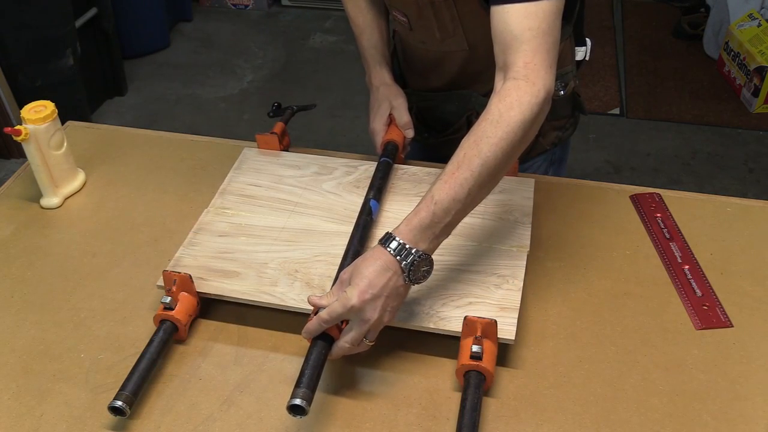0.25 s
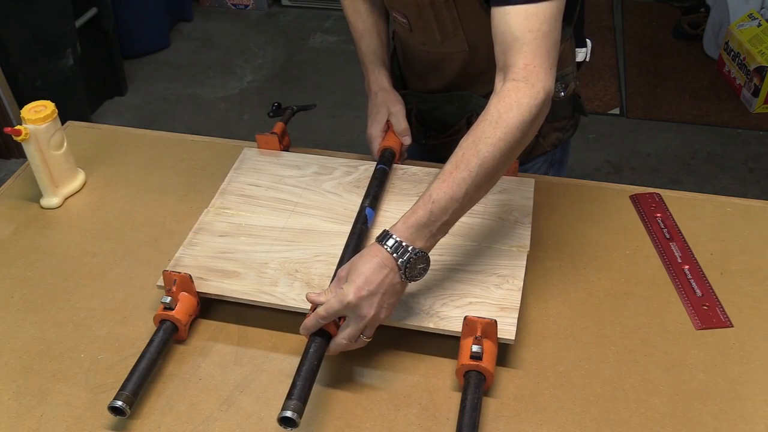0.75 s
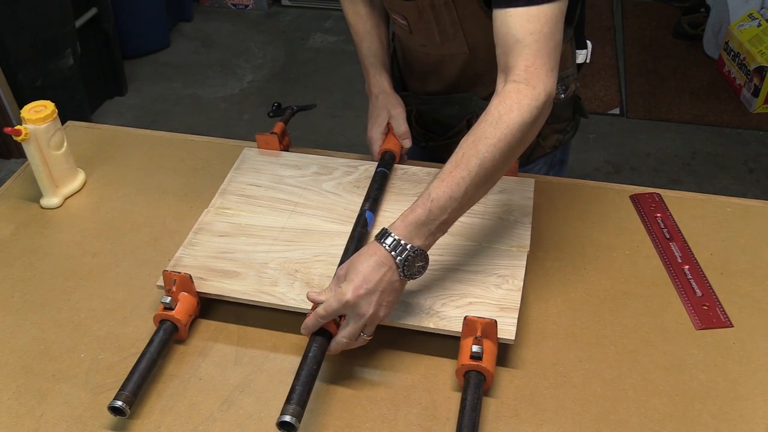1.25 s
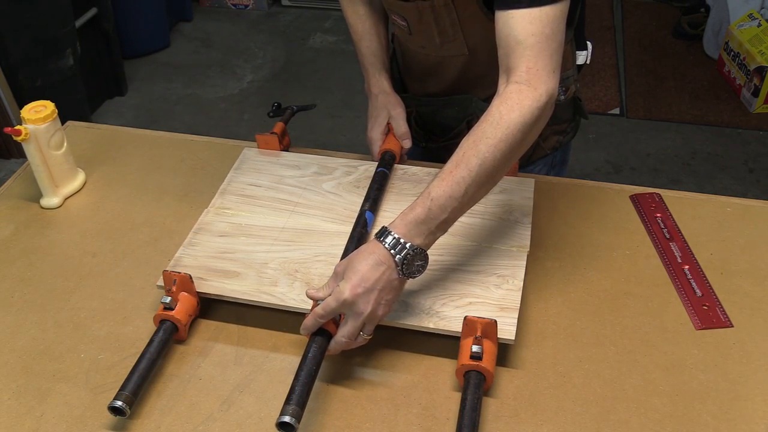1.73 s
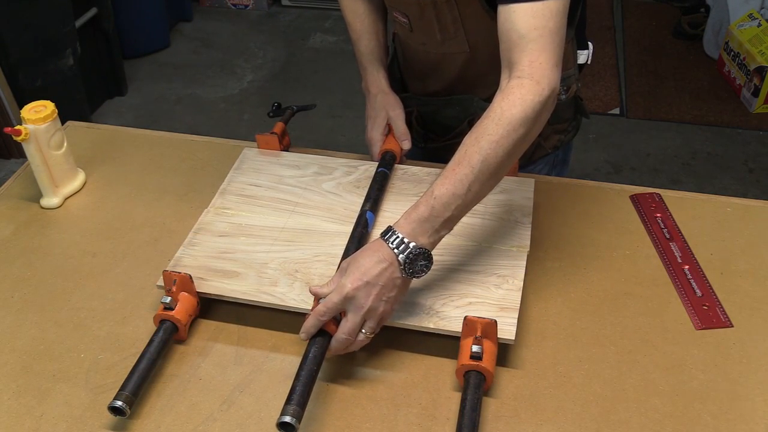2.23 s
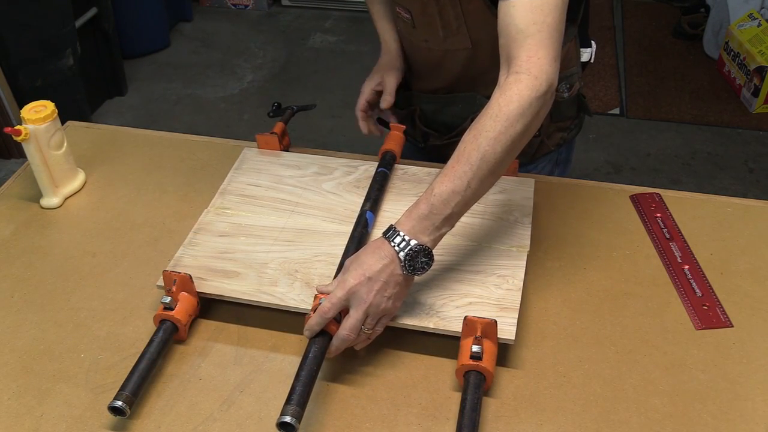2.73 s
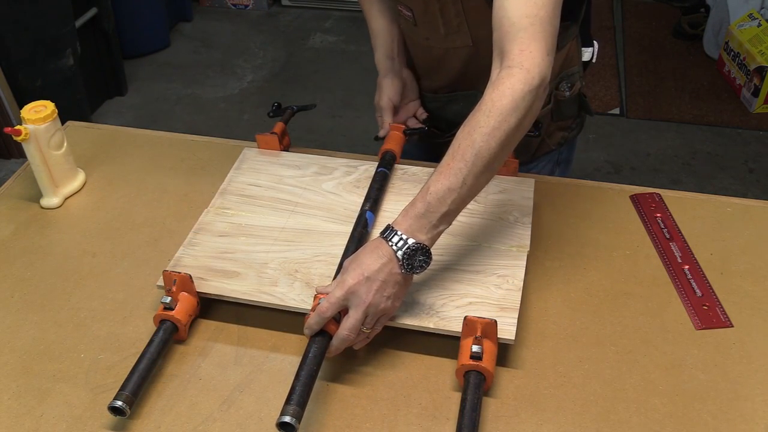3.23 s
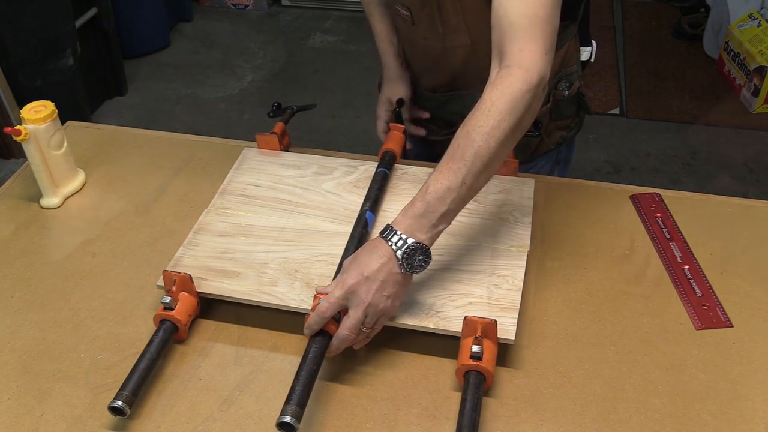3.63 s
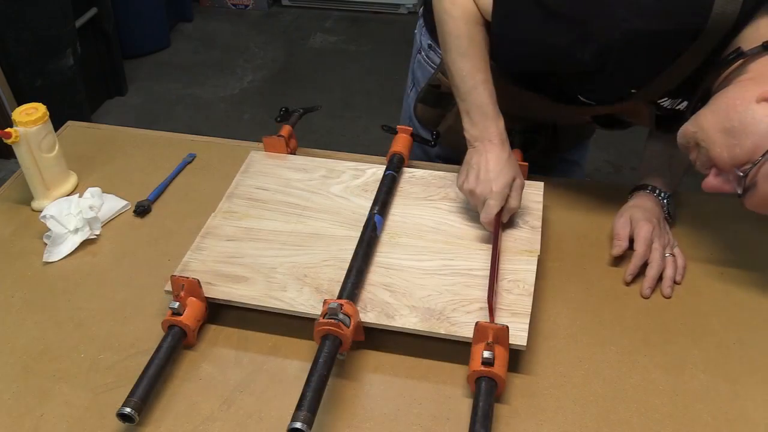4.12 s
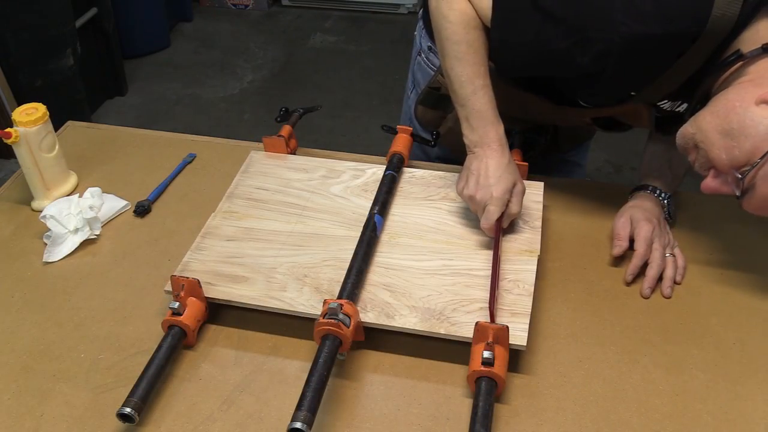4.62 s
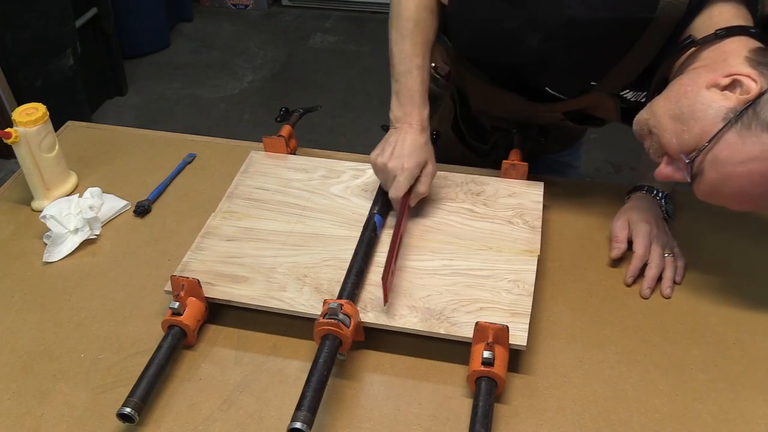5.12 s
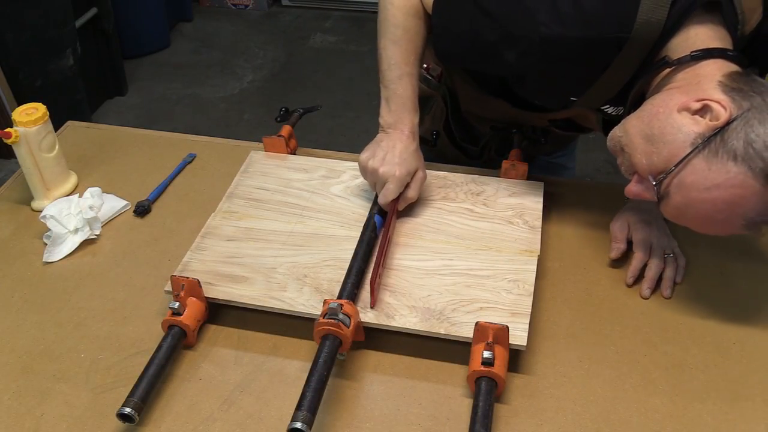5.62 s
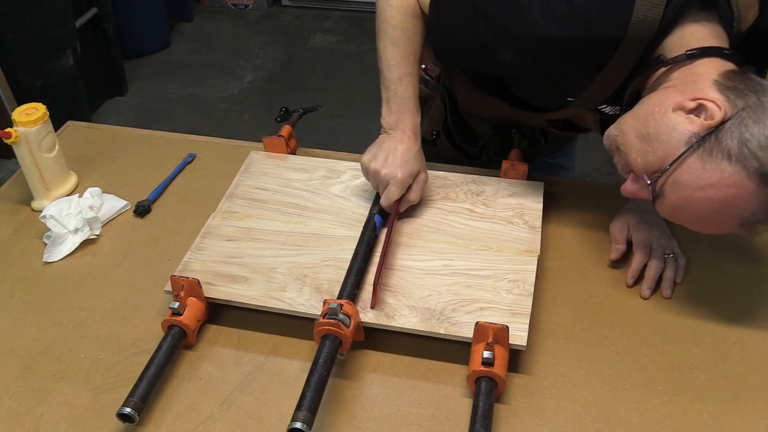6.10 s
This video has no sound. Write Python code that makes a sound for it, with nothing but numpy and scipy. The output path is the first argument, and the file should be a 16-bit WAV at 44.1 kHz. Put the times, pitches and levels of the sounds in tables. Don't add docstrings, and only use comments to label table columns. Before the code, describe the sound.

Dull, woody knocks of pipe clamps come irregularly, with tiny iron ticks and short drags, then bunch together as a loose jaw rattles while tightening. After a quieter spell of light metal-on-wood sliding, a thin rule slaps down loudly several times in quick succession, chattering to rest. Close pickup, small lively workshop, soft room air and hiss.

```python
import sys
import numpy as np
from scipy import signal
from scipy.io import wavfile
from scipy.ndimage import uniform_filter1d

SR = 44100
rng = np.random.default_rng(int(sys.argv[2]) if len(sys.argv) > 2 else 0)


def inscribe(sig):
    pcm = np.round(np.clip(np.atleast_2d(sig).T, -1, 1) * 32767)
    wavfile.write(sys.argv[1], SR, pcm.astype(np.int16))


def elevation(decibels):
    levels = np.asarray(decibels, float)
    return 10 ** (levels / 20)


N = 280476


def evened(x):
    return x / np.sqrt(np.mean(x ** 2) + 1e-20)


def add(mix, start_s, sound):
    part = mix[round(start_s * SR):][:len(sound)]
    part += sound[:len(part)]


def band(x, low_hz, high_hz):
    return signal.sosfilt(signal.butter(3, [low_hz, high_hz], "band", fs=SR, output="sos"), x)


def resonate(x, hz, width_hz):
    return signal.lfilter(*signal.iirpeak(hz, hz / width_hz, SR), x)


def rings(modes, luck, detune, length_s):
    hz, db, t60 = np.array(modes).T[:, :, None]
    t = np.arange(round(length_s * SR)) / SR
    hz = hz * (1 + detune * luck[:, :1])
    level = elevation(db + 1.13 * luck[:, 1:2] - 60 * t / t60)
    return t, level * np.sign(luck[:, 2:]) * np.sin(2 * np.pi * hz * t)


def blows_of(contacts, treble_db):
    return sorted((s, db, db + weight, db + ring, hz, db + ring + hard)
                  for rows, hard in zip(contacts, treble_db) for s, db, weight, ring, hz in rows)


GROUP_EDGES_HZ = [350, 650, 1300]
RISE_S = [0.002, 0.0046, 0.0013, 0.00088]


def knocks(events, body, softness, crack_db, bright_db, twin_s, twin_db, wash_db, wash_t60, wash_hz):
    low, high, power_in = np.zeros(N), np.zeros(N), np.zeros(N)
    hz = np.array(body)[:, 0]
    group = np.searchsorted(GROUP_EDGES_HZ, hz)
    lucks = rng.standard_normal((len(events), len(body), 3))
    t = np.arange(2000) / SR
    grits = rng.standard_normal((len(events), 2000))
    grits = grits * elevation(-60 * t / 0.021) * np.minimum(t / (softness * 0.00035), 1)
    bright = band(grits, 2740, 4500) + 0.26 * band(grits, 5230, 8600)
    cracks = band(grits, 580, 1430) + elevation(bright_db) * bright
    for (s, panel, bench, upper, spot_hz, treble), luck, crack in zip(events, lucks, cracks):
        t, modes = rings(body, luck, detune=0.0078, length_s=0.21)
        near = np.where(group == 2, elevation(-12 * np.minimum(abs(hz - spot_hz) / 200, 1)), 1)
        for k, db in enumerate([bench, panel, upper, treble]):
            rise = 1 - np.exp(-(t / (softness * RISE_S[k])) ** 2)
            part = (near[:, None] * modes)[group == k].sum(0) * rise
            add(high if k > 1 else low, s - .001, elevation(db) * part / abs(part).max())
        add(high, s - .0005, elevation(treble + crack_db) * crack / abs(crack).max())
        add(power_in, s + 0.0027, (elevation(upper) ** 2 + elevation(panel) ** 2) * np.hanning(200) / 100)
    add(low, twin_s, -elevation(twin_db) * high)
    power = signal.lfilter([1], [1, -elevation(-120 / (max(wash_t60, .02) * SR))], power_in)
    noise = rng.standard_normal(N)
    wash = evened(band(band(noise, 290, wash_hz), 190, 1.06 * wash_hz))
    wash += elevation(-13.5) * evened(band(noise, 1.05 * wash_hz, 1.41 * wash_hz))
    return low + high + elevation(wash_db) * np.sqrt(abs(power)) * wash


# pitch_hz, level_db, t60_s
CLAMP_BODY = [(172.6, 7.5, 0.17), (210, 10, 0.19), (309, 14, 0.068), (590, -11.5, 0.019), (427.4, 7, 0.03),
              (501, -5, 0.047), (707, -3.5, 0.049), (860, 7, 0.013), (990, -2.5, 0.046),
              (1138, -6.5, 0.017), (1590, -12, 0.054), (1560, 15.5, 0.013), (1892, 10.5, 0.022),
              (1980, 0, 0.028), (2430, -5.5, 0.025), (3050, -15, 0.02), (3330, -9, 0.034)]
# start_s, strength_db, weight into the bench_db, ring of the spot_db, pitch of the spot_hz
CLAMP_EDGE = [(.764, -53.5, -3, 13, 900), (.778, -50.5, 2, 9, 950), (.819, -65.5, -5, 22.5, 935),
              (1.138, -31, 6, -13, 945), (1.15, -32.5, 9, -19, 940), (1.495, -40.5, -1, -12, 920),
              (1.845, -38.5, -20, 10, 1080), (1.993, -35, -11, 1, 1080), (2.011, -45, -8, -1, 1200),
              (3.039, -46, 3, -5, 690), (3.367, -35.5, -13, -8, 990), (3.395, -28, -6, 3, 940),
              (3.4362, -21, -12, 2.5, 990), (3.444, -32, -16, 7.5, 680), (3.498, -34, -8, -1.5, 1010)]
CLAMP_FACE = [(1.058, -20.5, -24, 0, 870), (1.077, -51, 26.5, 19, 850), (1.165, -35, -3, -22, 724),
              (1.821, -39, -10, -6, 1000), (2.168, -37.5, -13, -1.5, 810), (2.519, -33, -7, -4.5, 750),
              (3.11, -30.5, -2.5, 2.5, 860), (3.274, -37, -8, -1, 1030), (3.331, -34.5, -8, -4, 830),
              (3.537, -24, -2.5, 11, 707), (3.575, -30, -9, 1, 706), (3.589, -53, -8, 21, 674)]
CLAMP_PAD = [
    (1.849, -19.5, -14.5, -8.5, 1080),
    (1.862, -47, 6, 2, 1140),
    (3.054, -35.5, 5, 6, 730),
    (3.129, -34, -4, 2.5, 700),
    (3.243, -32.5, -4, -4, 1090),
    (3.4, -27.5, -6.5, -3.5, 910),
    (3.476, -26, -11, 1, 680),
]


def clamp_blows():
    blows = blows_of([CLAMP_EDGE, CLAMP_FACE, CLAMP_PAD], treble_db=[-3.5, -16.5, -21])
    return elevation(-1.5) * knocks(blows, CLAMP_BODY, softness=2.55, crack_db=-10.5, bright_db=-13.0,
                              twin_s=0.004164, twin_db=-11.0, wash_db=-25.5, wash_t60=0.26, wash_hz=1300)


# pitch_hz, level_db, t60_s
RULE_BODY = [(201, -5.5, 0.24), (320, -0.5, 0.095), (419.8, 3, 0.27), (461, -2.5, 0.16), (579.6, 3.5, 0.14),
             (718, 8.5, 0.055), (870, -10.5, 0.087), (937, 2.5, 0.032), (1100, 13, 0.036), (1140, 6, 0.016),
             (1270, 6, 0.026), (1200, 4, 0.02), (1535, 12, 0.032), (1570, -8, 0.02), (1740, 15, 0.028),
             (1900, -4, 0.0053)]
RULE_EDGE = [
    (4.936, -41.5, 4.5, 0.5, 650),
    (5.046, -48, 5, 3, 850),
    (5.255, -51, -16, 5.5, 860),
    (5.3355, -6.5, -14.5, -3, 855),
    (5.371, -8, -17, 1.5, 870),
    (5.985, -51, -14, 1, 1220),
    (6.079, -60, 1, -13, 900),
    (6.284, -50, 2, 6, 1250),
]
RULE_FACE = [
    (3.963, -49, -17, 4, 730),
    (4.878, -46, 4.5, -6, 735),
    (5.387, -35, 9, 22.5, 860),
    (5.397, -15.5, -5.5, 0, 950),
    (5.416, -18.5, -2.5, -8, 920),
    (5.839, -53.5, -8, 5, 650),
    (6.17, -55, 13.5, 4, 950),
    (6.317, -36.5, -10, -12, 643),
]


def rule_blows():
    blows = blows_of([RULE_EDGE, RULE_FACE], treble_db=[-5.5, -12.5])
    return elevation(-2.5) * knocks(blows, RULE_BODY, softness=0.6, crack_db=-6.0, bright_db=-24.0,
                              twin_s=0.002813, twin_db=4.0, wash_db=-26.5, wash_t60=0.57, wash_hz=1300)


# pitch_hz, level_db, t60_s
LANDED_BODY = [(163, -13, 0.14), (214, -6, 0.11), (336, -3, 0.24), (404, 3, 0.2), (470, -5, 0.069),
               (553, 2.5, 0.23), (709, -6, .05), (850, -7, 0.041), (935, -11, 0.073), (1070, 5, 0.071),
               (1220, 17, 0.012), (1498, -1, 0.058), (1600, 6, 0.024), (1730, 6, 0.045)]
LANDING = [
    (5.46, -13, -11, 5.5, 1158),
    (5.472, -27.5, 3, -12, 1010),
    (5.503, -23, -10, -23, 940),
]


def rule_landing():
    return knocks(blows_of([LANDING], treble_db=[-4.5]), LANDED_BODY, softness=0.51, crack_db=0.5,
                  bright_db=-30.5, twin_s=0.00285, twin_db=3.5, wash_db=-25.0, wash_t60=0.64, wash_hz=1316)


# start_s, level_db, pitch_hz, t60_s
TAPS = [(1.822, -46, 900, .012), (3.433, -34.5, 3240, 0.025), (3.438, -36.5, 2860, .04),
        (3.476, -44, 1560, .04), (3.536, -44, 3280, 0.023), (3.537, -43, 2850, 0.028),
        (3.989, -48, 2000, 0.023), (4.9757, -32.5, 1390, 0.0095), (4.977, -35, 700, 0.017),
        (5.067, -28, 1360, 0.01), (5.068, -29.5, 530, 0.03), (5.371, -24, 4300, 0.0069),
        (5.4613, -30, 3260, 0.0047), (5.842, -37.5, 800, 0.011), (6.319, -33, 547, 0.034),
        (.7637, -44, 1300, .01), (.782, -40, 2090, .02), (.804, -47, 1700, .015), (.8186, -38, 2000, 0.014),
        (1.0, -43, 2030, 0.014), (1.0406, -47, 2080, 0.016), (1.101, -40, 1700, .008),
        (1.133, -47, 2020, .03), (3.105, -47, 1850, .03), (6.226, -39.5, 1300, .012),
        (1.847, -44, 3230, .01), (3.455, -45, 1600, 0.027), (3.534, -38, 1900, 0.023),
        (5.337, -33, 2450, 0.018), (5.3709, -8.5, 1570, 0.019), (5.4607, -35, 5800, 0.0038),
        (6.358, -8.5, 1200, 0.0036), (6.3575, -27.5, 4730, 0.0031)]
# start_s, level_db, pitch_hz, t60_s
BLOW_MODES = [(1.067, -33.5, 190, 0.13), (1.129, -33, 109, 0.16), (1.158, -34, 503, .08), (1.138, -29, 310, .07),
              (1.139, -32, 500, .1), (1.0585, -28, 880, .04), (1.069, -35, 850, .04), (1.077, -31, 400, .05),
              (1.06, -42, 1480, .04), (1.186, -38, 450, .04), (2.52, -36, 480, .02), (5.336, -24, 290, .06),
              (1.8495, -25.5, 448, 0.027), (1.866, -29.5, 496, 0.037), (1.851, -28, 1070, 0.027),
              (2.1685, -18, 484, .045), (2.184, -25.5, 470, 0.046), (2.525, -30.5, 410, 0.037),
              (3.272, -28, 454, 0.092), (3.275, -35, 987, 0.033), (3.283, -27.5, 450, 0.036),
              (5.337, -14, 1150, 0.038), (5.341, -17.5, 455, 0.08), (5.343, -12, 571, 0.13),
              (5.385, -21, 934, .08),
              (3.04, -29, 220, 0.16), (3.041, -31, 400, 0.12), (3.065, -33, 232, 0.08),
           (3.118, -32, 513, 0.033), (3.138, -30, 380, 0.062), (3.177, -35, 350, 0.028),
           (3.249, -30, 397, 0.045), (3.26, -29, 380, 0.029), (3.001, -49, 1850, .04),
           (6.284, -40, 1200, .015), (1.847, -33, 1900, 0.014), (1.856, -40, 1580, .02),
           (1.995, -37, 1530, 0.022), (2.011, -37, 454, 0.016), (3.3951, -28, 1800, 0.021),
           (3.402, -26, 950, .03), (3.415, -33, 950, .025), (3.432, -18.5, 450, 0.034),
           (3.4382, -23, 1570, 0.044), (3.452, -27, 478, .05), (3.478, -35, 780, .03),
           (3.511, -34, 500, 0.027), (3.587, -31, 700, 0.027), (5.336, -28, 1900, 0.023),
           (5.336, -15, 840, .03), (5.337, -38, 4300, 0.011), (5.388, -14, 1540, 0.022),
           (5.398, -25, 1900, .02), (5.418, -27, 1150, .02), (5.4605, -29, 1960, .015),
           (5.462, -23, 2900, .012), (5.461, -27, 2450, .015), (5.462, -13, 438, 0.043)]
LINGERS = [(5.345, -21, 870, 0.24), (5.35, -25, 933, .2), (5.385, -28, 1160, .1), (5.385, -28, 1600, .1),
           (5.385, -30, 1750, .1), (5.462, -18, 1750, .03), (5.47, -27, 549, .3), (5.49, -36, 930, .4),
           (5.372, -17, 578, 0.14), (5.371, -21, 426, 0.16), (5.39, -18.5, 935, 0.18),
           (5.47, -26, 1064, 0.22), (5.468, -47, 1230, .4), (5.469, -44, 1630, 0.27),
           (5.475, -33, 404, .35), (5.47, -35.5, 841, 0.52), (5.47, -44.5, 1453, 0.45),
           (5.337, -20, 419, .2), (5.35, -20, 567, .2), (5.448, -26, 600, 0.055)]


def taps():
    out, t = np.zeros(N), np.arange(12000) / SR
    for s, db, hz, t60 in TAPS + BLOW_MODES + LINGERS:
        pair = np.sin(2 * np.pi * hz * t) + 0.11 * np.sin(2 * np.pi * 1.13 * hz * t)
        rise = np.minimum(t * hz / 0.82, 1)
        add(out, s, elevation(db - 60 * t / t60) * pair * rise)
    return out


# pitch_hz, level_db, t60_s
IRON = [(2116, -12.5, 0.56), (2325, -16, 0.51), (2770, -13, 0.34), (2939, -9, 0.55), (2987, -12, 0.7),
        (3240, -0.5, 0.045), (3892, -21, 0.54), (4180, -19, 0.55), (4600, -8, 0.19), (4650, -15.5, 0.55),
        (5360, -15.5, .25), (5850, -16.5, 0.39), (7130, -8, .07), (7700, -12, 0.065), (8300, -21, .06)]


def iron_clink():
    out = np.zeros(N)
    luck = rng.standard_normal((len(IRON), 3)) * [0, 0, 1]
    t, modes = rings(IRON, luck, detune=0, length_s=.5)
    crack = 1.1 * band(rng.standard_normal(len(t)), 1070, 7000) * elevation(-60 * t / 0.09)
    add(out, .131 - .003, elevation(-15 - 24.5) * (modes.sum(0) + crack) * np.minimum(t / 0.0018, 1))
    return out


# ratio to the main ring, level_db, t60_s
SMALL_IRON = [(.9, 0, .03), (1, 0, .028), (1.17, -9, .02), (1.64, -7, .02)]
# start_s, level_db, share of the lowest mode, pitch of the main ring_hz
TICKS = [(0.765, -47, .1, 4970), (.82, -59, 0.13, 4960), (1.03, -51, .1, 5030), (1.08, -56, .1, 4950),
         (1.12, -47, .1, 4970), (3.801, -50, 0.98, 4680), (3.812, -48, 0.98, 4600), (3.819, -46, .95, 4680),
         (3.829, -51, 0.83, 4650), (3.866, -51, .1, 5450), (3.893, -37, 0.36, 4620), (3.914, -50, .1, 4700),
         (3.921, -40, 0.15, 4630), (3.931, -51, 0.08, 4680)]


def iron_ticks():
    out = np.zeros(N)
    lucks = rng.standard_normal((len(TICKS), len(SMALL_IRON), 3))
    for (s, db, share, pitch_hz), luck in zip(TICKS, lucks):
        t, modes = rings(np.multiply(SMALL_IRON, [pitch_hz, 1, 1]), luck, detune=0.0023, length_s=.15)
        ring = share * modes[0] + (1.1 - share) * modes[1:].sum(0)
        add(out, s, elevation(db) * ring * np.minimum(t / 0.0047, 1))
    return out


def scrapes(strokes, body, slips_per_s, slip_db):
    start, out = strokes[0][0] - .4, np.zeros(N)
    n = round((strokes[-1][0] + .5 - start) * SR)
    slips = (rng.random(n) < slips_per_s / SR) * elevation(slip_db * np.minimum(rng.exponential(1, n), 4))
    drive = evened(slips * rng.choice([-1, 1], n)) + .5 * rng.standard_normal(n)
    sound = np.zeros(n)
    for k, (hz, width, db) in enumerate(body):
        resonance = resonate(resonate(drive, hz, width), hz, 2 * width)
        sound += (-1) ** k * elevation(db) * evened(resonance)
    level, t = np.zeros(n), start + np.arange(n) / SR
    for s, db, build, release in strokes:
        level += elevation(db - 20 * np.maximum((s - t) / build, (t - s) / release))
    add(out, start, evened(sound) * uniform_filter1d(level, size=200))
    return out


# time of most pressure_s, level_db, build-up_s, release_s
CLAMP_SCRAPES = [(.44, -55.5, 0.043, 0.073), (.468, -44.5, 0.064, 0.063), (.497, -50, .07, 0.088),
                 (.636, -50.5, .09, 0.076), (.785, -47, 0.082, 0.044), (1.054, -51, 0.079, 0.026),
                 (1.1, -51.5, 0.023, 0.056), (3.008, -55, 0.024, 0.022), (3.778, -58.5, .14, 0.12),
                 (3.92, -63, 0.17, 0.08)]
# pitch_hz, width_hz, level_db
CLAMP_RUB = [(350, 130, -0.5), (1080, 450, 2), (1570, 730, -2.5), (1940, 620, 4), (2460, 550, -5.5),
             (3330, 120, -9), (4370, 5400, -9.5), (4950, 340, -8)]


def clamp_scrapes():
    return scrapes(CLAMP_SCRAPES, CLAMP_RUB, slips_per_s=1400, slip_db=1.0)


RULE_SLIDES = [(4.198, -47.5, 0.034, 0.06), (4.232, -49, 0.063, 0.1), (4.275, -49, 0.097, 0.05),
               (4.32, -62, 0.026, 0.07), (4.49, -57.5, 0.11, 0.09), (4.598, -51, 0.075, 0.13)]
# pitch_hz, width_hz, level_db
RULE_SLIDE_RUB = [(425, 410, 4), (970, 69, -2.5), (1150, 83, 2), (1600, 200, -3), (1816, 130, 0.5),
                  (2700, 1100, -9.5), (4740, 2500, -8)]
RULE_SCRAPES = [
    (4.895, -51, 0.04, 0.14),
    (4.935, -57, 0.037, .08),
    (6.29, -44, 0.02, 0.065),
    (6.33, -52, .05, .08),
]
RULE_RUB = [(454, 440, 5.5), (950, 170, -4), (1140, 120, -4), (1530, 140, -5), (1790, 150, -0.5),
            (2680, 1300, -5), (5500, 4600, -5)]


def rule_scrapes():
    slides = scrapes(RULE_SLIDES, RULE_SLIDE_RUB, slips_per_s=1800, slip_db=2.0)
    return slides + scrapes(RULE_SCRAPES, RULE_RUB, slips_per_s=1600, slip_db=1.5)


CHATTER = [
    (5.338, -44, 0.003, 0.029),
    (5.374, -36, 0.004, 0.028),
    (5.39, -40, .015, 0.072),
    (5.463, -37.5, .004, 0.0099),
    (5.475, -53.5, .01, .1),
]
# pitch_hz, width_hz, level_db
CHATTER_RING = [(2000, 400, 11.5), (2480, 480, 13), (3080, 210, 3), (3430, 190, 7.5), (4300, 440, -5),
                (4690, 300, -17), (6430, 2100, -19)]


def rule_chatter():
    return scrapes(CHATTER, CHATTER_RING, slips_per_s=950, slip_db=1.0)


RATTLES = [
    (3.405, -33, 0.03, 0.068),
    (3.455, -39, 0.02, 0.091),
    (3.49, -32, 0.031, 0.057),
    (3.575, -46, 0.027, 0.036),
]
# pitch_hz, width_hz, level_db
RATTLE_RING = [(304, 220, -0.5), (490, 120, 0), (700, 49, -6), (900, 57, -7.5), (1560, 67, -16),
               (1850, 98, -23), (2300, 200, -22)]


def jaw_rattle():
    return scrapes(RATTLES, RATTLE_RING, slips_per_s=900, slip_db=4.5)


GRIT = [(1.848, -46.5, .005, .04), (1.996, -51, .005, 0.031), (3.398, -47, 0.0037, 0.035),
        (3.436, -42, .005, 0.03), (3.48, -53, 0.017, .1), (3.538, -50, .004, 0.043)]
# pitch_hz, width_hz, level_db
GRIT_RING = [(1250, 470, 3), (1900, 550, 2), (2340, 330, -5), (3120, 1400, -5)]


def grit_crunch():
    return scrapes(GRIT, GRIT_RING, slips_per_s=1100, slip_db=3.0)


# pitch_hz, t60_s
SHOP = [(100, 0.38), (250, 0.4), (500, 0.53), (1000, 0.43), (2000, 0.28), (3000, 0.49), (8000, 0.74)]
# delay_s, level_db
ECHOES = [(.0082, -14), (0.015, -26.5), (0.023, -36), (.036, -33.5)]


def shop(x):
    sparse, early = np.zeros(SR), np.zeros(2000)
    at = np.arange(400, SR - 20, 20)
    sparse[at + rng.integers(0, 20, len(at))] = rng.choice([-1., 1.], len(at))
    hz, t, z = signal.stft(sparse, SR, nperseg=256)
    tail = signal.istft(z * elevation(-60 * t / read(SHOP, hz)[:, None]), SR, nperseg=256)[1]
    for s, db in ECHOES:
        add(early, s, elevation(db) * np.hanning(9) / 4)
    late = elevation(-11.5) * signal.fftconvolve(x, tail / np.linalg.norm(tail))[:N]
    return x + signal.fftconvolve(x, early)[:N] + late


def read(points, hz):
    f, value = np.transpose(points)
    return np.interp(np.log(hz + 1), np.log(f + 1), value)


def coloured(spectrum, patchy_db):
    hz = np.fft.rfftfreq(1024, 1 / SR)
    a, b, patches = rng.standard_normal((N // 256 + 5, 513, 3)).T
    patches = evened(uniform_filter1d(uniform_filter1d(patches, size=8, axis=0), size=12, axis=1))
    depth_db = patchy_db / (1 + (hz[:, None] / 2000) ** 2)
    z = (a + 1j * b) * elevation(read(spectrum, hz)[:, None] + depth_db * patches)
    return evened(signal.istft(z, nperseg=1024, noverlap=768)[1][:N])


# pitch_hz, level_db, waver of the hum or width of the whine_hz
HUM = [(59.8, -54, 0.22), (911, -64, 4.1)]


def shop_hum():
    t = np.arange(N) / SR
    (hz, db, waver), (whine_hz, whine_db, width_hz) = HUM
    swell = 1 + waver * 0.17 * np.sin(2 * np.pi * 0.73 * t)
    hum = elevation(db) * np.sqrt(2) * np.sin(2 * np.pi * hz * t) * swell
    return hum + elevation(whine_db) * evened(resonate(rng.standard_normal(N), whine_hz, width_hz))


# pitch_hz, level_db per Hz
AIR_EARLY = [(12, -41), (20, -23), (60, -1.5), (70, 1), (91, -14.5), (177, -7.5), (241, -15.5), (310, -6),
             (337, -10), (459, -13.5), (660, -18.5), (897, -18), (1370, -26), (12100, -36.5), (16000, -40)]
AIR_LATE = [(12, -36), (20, 5), (48, 1.5), (77, -7.5), (138, 0), (204, -6), (293, 1), (328, -7), (367, -1),
            (607, -10.5), (738, -11.5), (1090, -13), (2020, -22), (6910, -26.5), (16000, -31.5)]


def air():
    hum_stop_s = 3.91
    late = np.clip((np.arange(N) / SR - hum_stop_s) / 0.3 + .5, 0, 1)
    before = shop_hum() + elevation(-49.5) * coloured(AIR_EARLY, patchy_db=0.5)
    after = elevation(-49) * coloured(AIR_LATE, patchy_db=0.5)
    return np.sqrt(1 - late) * before + np.sqrt(late) * after


# pitch_hz, level_db per Hz
HISS = [(12, -37), (20, 2), (65, -8), (399, -15), (1810, -17), (6010, -17.5), (14700, -21.5),
        (16000, -21.5)]


def hiss():
    return elevation(-60) * coloured(HISS, patchy_db=0.0)


def scene():
    work = clamp_blows() + rule_blows() + rule_landing() + taps()
    work += iron_clink() + iron_ticks()
    work += clamp_scrapes() + rule_scrapes()
    work += rule_chatter() + jaw_rattle() + grit_crunch()
    mid, side = shop(work) + air(), hiss()
    return np.array([mid + side, mid - side])


def roll_off(x):
    return signal.sosfilt(signal.butter(12, 15770, fs=SR, output="sos"), x)


def record(dry):
    edge = signal.firwin(511, 16000, window=("kaiser", 9), fs=SR)[None]
    limited = 1.084 * np.tanh(dry / 1.134)
    return roll_off(signal.oaconvolve(limited, edge, "same"))


dry = scene()
out = record(dry)
inscribe(out)
```